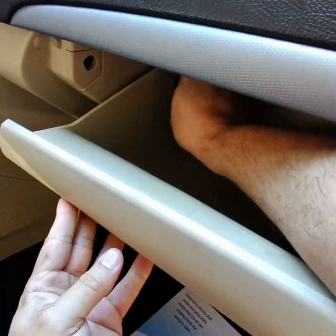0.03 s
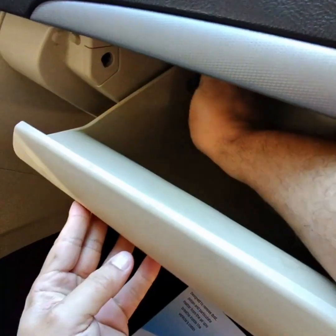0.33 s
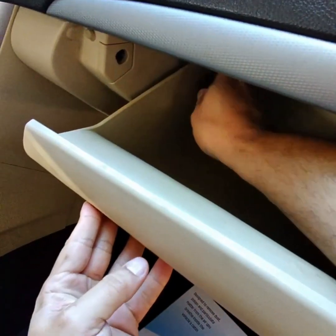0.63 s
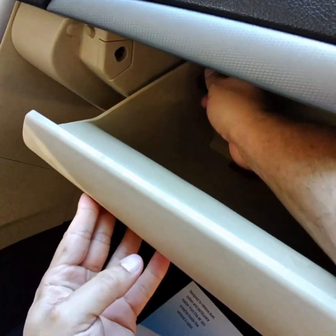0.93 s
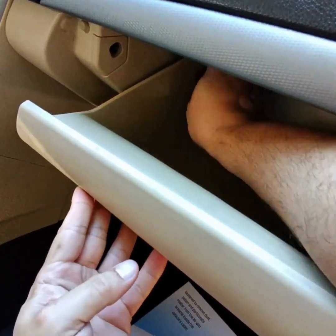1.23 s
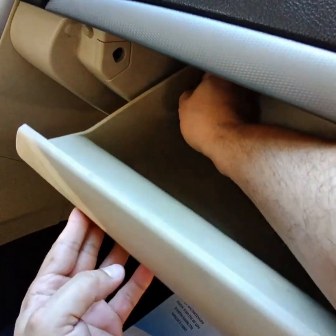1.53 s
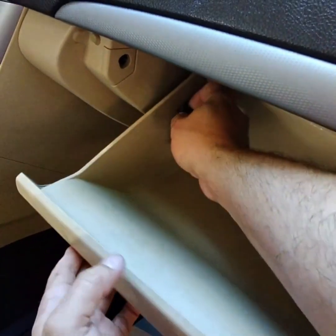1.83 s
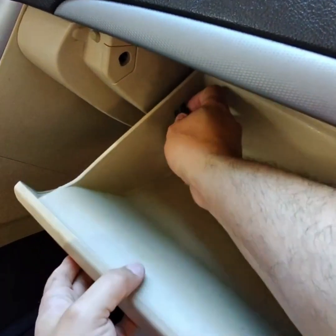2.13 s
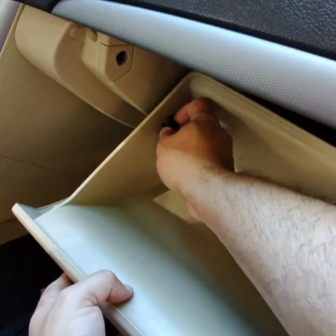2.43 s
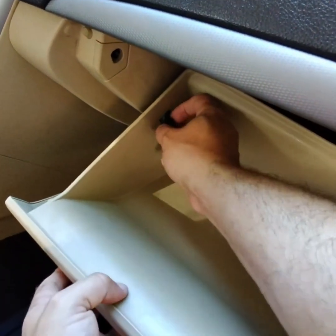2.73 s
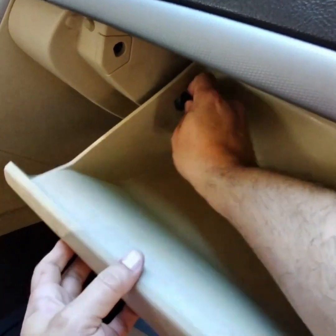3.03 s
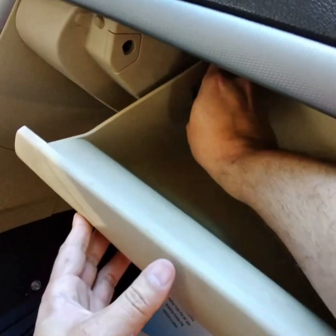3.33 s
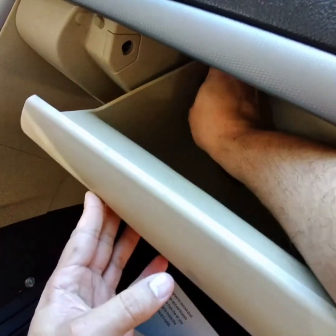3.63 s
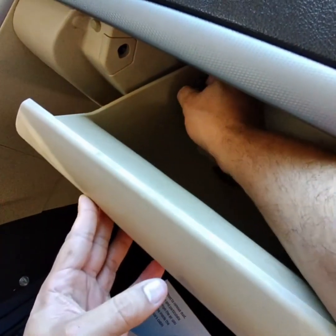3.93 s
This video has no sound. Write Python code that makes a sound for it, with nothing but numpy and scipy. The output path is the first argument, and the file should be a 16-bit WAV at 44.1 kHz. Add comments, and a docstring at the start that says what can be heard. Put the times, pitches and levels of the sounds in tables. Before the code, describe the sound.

Hands rummage in a plastic glove box inside a parked car, heard close up. Faint knocks, clicks and skin rustles mix with brief scrapes as the bin moves, until a catch snaps sharply. A faint rumble lies underneath.

```python
"""Rummaging in a glove box

In a parked car, one hand feels around an open plastic glove box while the other lowers and lifts its lid.
Fingers and a small part knock on the bin and ring its modes; skin hisses over the plastic,
and the bin scrapes and judders on its guides. At the end a catch snaps home. A faint rumble lies below."""
import sys
import numpy as np
from scipy import signal
from scipy.fft import rfft, irfft
from scipy.io import wavfile

SR = 44100
rng = np.random.default_rng(int(sys.argv[2]) if len(sys.argv) > 2 else 0)


def dump(signal):
    """Clip the signal to [-1, 1] and save it as 16-bit WAV at the path in sys.argv[1]."""
    limited = np.clip(np.atleast_2d(signal).T, -1, 1)
    pcm = np.round(limited * 32767).astype(np.int16)
    wavfile.write(sys.argv[1], SR, pcm)


N = 176400
T = np.arange(N) / SR

# modes of the bin: (pitch [Hz], t60 [s], level from the wall [dB], the catch [dB], the guides [dB])
BIN_MODES = [(95.4, 0.42, -7, -7, -2.5), (142.5, 0.13, -7.5, -7, -12), (181.4, 0.18, -3, -10.5, -6),
             (227.3, .1, -5.5, -2, 3.5), (312, 0.04, -0.5, 4, 0), (380, 0.047, -6, -12, -2.5),
             (437.3, 0.038, -7.5, -5.5, -8), (550, 0.055, -7.5, -12, -7), (688, 0.035, 3.5, 0, 4.5),
             (941, 0.036, -1, -5, 0.5), (1079, 0.04, -7, -7, -3.5), (1273, 0.019, 7, 1.5, 10.5),
             (1525, 0.024, 5, -10, -1.5), (1642, 0.019, 0.5, 2, 3), (1779, 0.053, -3, -1, -5),
             (2034, 0.019, -2, 4.5, 8), (2344, 0.031, -5, -7, 1), (2582, 0.057, -10.5, -13.5, -2),
             (2947, 0.036, -28, -4, -31), (3950, 0.067, -25, -8, 1), (4710, 0.045, -15.5, -12, -5),
             (6230, .029, -19, -11, -2), (13300, .03, -25, -6, -26)]
# the bin's four registers, thud, knock, clack and crack: (lower edge [Hz])
REGISTER_EDGES = (0, 480, 1100, 3300)
# cabin rumble: (frequency [Hz], relative level [dB])
RUMBLE_COLOUR = [(20, -24), (38, -14), (55, -5.5), (90, 2), (125, -8), (200, -7), (330, -16), (500, -23.5),
                 (750, -17.5), (1300, -29), (2200, -34), (3300, -45.5), (6000, -47)]
# steady hiss: (frequency [Hz], relative level [dB])
HISS_COLOUR = [(1000, 6.5), (2300, 5), (3500, 4.5), (5500, -10.5), (7500, -3.5), (10000, 1), (13000, 4),
               (15000, 4)]
# hands fidgeting on the bin: (time [s], level before the register trims [dB])
FIDGET_LEVELS = [(.1, -63), (.6, -69.5), (.85, -58.5), (1.25, -54.5), (1.5, -55), (1.95, -63.5),
                 (2.3, -50.5), (2.55, -58.5), (2.95, -58.5), (3.4, -56), (3.65, -58), (3.87, -75)]
# arm brushing the bin: (time [s], level [dB])
RUSTLE_LEVELS = [(.1, -73.5), (1.9, -85.5), (2.15, -72), (2.5, -65), (2.9, -79), (3.1, -71), (3.6, -65),
                 (3.85, -92)]
# its soft tone: (frequency [Hz], relative level [dB])
ARM_COLOUR = [(300, -11.5), (700, -3.5), (1300, -7), (1900, 0.5), (2400, -4), (3000, -27), (5000, -28.5)]
# knocks on the bin wall:
# (time [s], contact length [s], thud [dB], knock [dB], clack [dB], crack [dB], favoured pitch [Hz])
KNOCKS = [(0.092, 0.0063, -62, -59, -66, -74, 1030), (0.134, 0.002, -69, -58.5, -59.5, -89, 1100),
          (0.333, 0.0022, -47, -55.5, -79, -78, 260), (0.413, 0.0034, -54, -79, -63, -63.5, 300),
          (0.5524, 0.0018, -42.5, -49.5, -59.5, -89, 355), (0.7066, 0.002, -50, -48, -45.5, -53, 1720),
          (0.803, 0.0018, -55.5, -61, -65.5, -68.5, 365), (0.857, 0.0055, -53.5, -56, -59.5, -84, 334),
          (0.886, 0.0059, -44, -53, -74, -88, 1060), (0.9055, 0.0031, -48, -43.5, -46, -56, 690),
          (1.0106, 0.00068, -50.5, -38.5, -39.5, -56, 2170), (1.057, 0.0015, -52, -52.5, -92, -83, 664),
          (1.113, 0.0035, -52.5, -57, -67, -71, 324), (1.182, 0.0049, -52.5, -46.5, -56.5, -81, 554),
          (1.3305, 0.003, -51, -53, -51, -75, 700), (1.3378, 0.0028, -41.5, -38.5, -44.5, -62, 2160),
          (1.392, 0.0012, -61, -59.5, -51.5, -58, 1490), (1.434, 0.0074, -52, -56, -61, -66, 365),
          (1.5914, 0.0064, -42, -46, -49.5, -55, 388), (2.049, 0.0014, -50, -58.5, -68, -83, 406),
          (2.2186, 0.00073, -50.5, -60, -53, -49.5, 1360), (2.386, 0.0024, -46, -53, -58.5, -59, 327),
          (2.402, 0.0025, -45.5, -50, -53.5, -57, 320), (2.413, 0.0045, -49.5, -79, -56, -69, 1590),
          (2.61, 0.0034, -53, -53, -58.5, -60, 810), (2.687, 0.0013, -43.5, -50.5, -63, -64.5, 440),
          (2.762, 0.0013, -50, -55.5, -59, -70, 1250), (2.812, 0.0059, -58, -57, -54.5, -67, 1250),
          (2.828, 0.0048, -53, -61, -55, -68, 307), (2.846, 0.004, -51.5, -56.5, -78, -76, 264),
          (2.951, 0.0028, -53, -58, -85, -81, 310), (3.043, 0.0035, -71, -57, -62, -66.5, 1650),
          (3.2066, 0.0042, -55, -52, -48, -80, 2620), (3.212, 0.0032, -43.5, -51, -50, -78, 2560),
          (3.218, .002, -39.5, -41, -44.5, -71, 454), (3.279, 0.0081, -49, -50.5, -62.5, -87, 970),
          (3.291, 0.0044, -73, -48.5, -71, -85, 970), (3.417, 0.0059, -49, -54, -55.5, -63, 310),
          (3.47, 0.0029, -47, -53.5, -51, -58, 278), (3.555, 0.0028, -48.5, -59.5, -61, -80, 324),
          (3.67, 0.008, -54.5, -56.5, -59.5, -68.5, 380), (3.688, 0.0042, -50, -55, -69, -83, 268),
          (3.806, 0.0033, -57, -59.5, -70, -92, 980)]
# bright crack of a hard contact: (frequency [Hz], relative level [dB])
CRACK_COLOUR = [(2400, -8), (3300, -4), (3800, -3), (4500, 2.5), (5600, -6.5), (6800, -4), (9000, -6),
                (11000, -2.5), (13200, -2), (15000, 1)]
# skin sliding over plastic: (start [s], end [s], level [dB])
SKIN_SLIDES = [(0.282, 0.447, -70.5), (0.625, 0.704, -70), (1.06, 1.177, -62.5), (1.15, 1.307, -59.5),
               (1.27, 1.412, -68), (1.892, 1.98, -65.5), (2.012, 2.164, -62.5), (2.097, 2.246, -65.5),
               (2.176, 2.486, -57), (2.78, 2.91, -65), (3.022, 3.152, -58), (3.36, 3.495, -68.5)]
# its hiss: (frequency [Hz], relative level [dB])
SKIN_COLOUR = [(1500, -15), (3200, 0), (4600, -5), (5400, -9), (6500, -6.5), (9000, 1.5), (12500, 2),
               (14500, 2)]
# three short chirps, then a faint, thin high ring after the knocks:
# (time [s], length [s], first pitch [Hz], last pitch [Hz], peak level [dB])
CHIRPS_AND_RING = [(1.175, 0.019, 665, 520, -33), (2.399, 0.013, 13800, 13000, -53),
                   (2.832, .02, 6600, 9000, -65), (3.21, 0.048, 8600, 8450, -73)]
# the bin scraping its guides: (start [s], end [s], thud [dB], knock [dB], clack [dB], crack [dB])
GUIDE_RUBS = [(1.572, 1.724, -48.5, -55.5, -54, -71), (1.642, 1.781, -43.5, -55.5, -49.5, -69),
              (2.068, 2.239, -47, -53, -57, -69.5), (2.333, 2.45, -54, -55.5, -60, -74),
              (2.788, 2.87, -56.5, -60, -59, -77), (3.059, 3.157, -52, -65, -61.5, -84)]
# the bin juddering on its way down: (start [s], end [s], pitch [Hz], level [dB])
JUDDERS = [(1.654, 1.77, 120.4, -47), (2.064, 2.236, 152, -43)]
# the catch tripping: (time [s], half-width [s], pitch [Hz], peak level [dB])
CATCH_TICK = [(3.9144, 0.00045, 1580, -7.5)]
# the catch slamming and settling:
# (time [s], contact length [s], thud [dB], knock [dB], clack [dB], crack [dB], favoured pitch [Hz])
CATCH_HITS = [(3.9168, 0.0019, -25, -27, -21, -31, 4300), (3.9255, 0.0022, -47, -49, -54, -58, 280),
              (3.945, .004, -45, -53, -52, -64, 310)]
# two microphone ports, alike in the lows: (frequency [Hz], left over right [dB], left phase lead [rad])
PORT_LOWS = [(450, 0, 0)]
# and unlike higher up: (frequency [Hz], left over right [dB], left phase lead [rad])
PORT_HIGHS = [(1220, 0, 0.12), (2250, -1.4, 0.44), (3200, 0, 2.22), (4400, -2.5, 1.92), (5200, -8.5, 2.16),
              (7350, 2.5, -0.39), (11000, 10, -0.22), (14700, 11, -0.58)]

CRACK_T60_S, CRACK_TAIL_T60_S, CRACK_TAIL_DB = 0.0093, 0.075, -3
CRACK_LIKENESS, CRACK_RING_DB = 0.53, -7
FAVOUR_DB, FAVOUR_WIDTH_OCTAVES = 13.5, 0.21


def from_db(db):
    """Decibels to gain."""
    return 10 ** (np.asarray(db) / 20)


def rms_one(x):
    """Scale to unit rms."""
    return x / np.sqrt(np.mean(x ** 2) + 1e-20)


def mix(levels_db, layers):
    """Sum layers, each at its own level."""
    return sum(from_db(db) * layer for db, layer in zip(levels_db, layers))


def over_hz(points, size):
    """Spread the columns of a frequency table over an FFT grid."""
    hz, *columns = np.transpose(points)
    return [np.interp(np.log(np.fft.rfftfreq(size, 1 / SR) + 1), np.log(hz), c) for c in columns]


def lowpass(x, hz):
    """Roll off the top at 12 dB an octave."""
    return signal.sosfilt(signal.butter(2, hz, fs=SR, output="sos"), x)


def noise(colour, likeness=1):
    """Coloured stereo noise; likeness runs from 0 (wide) to 1 (mono)."""
    mid, side = irfft(rfft(rng.standard_normal((2, N))) * from_db(over_hz(colour, N)[0]), N)
    return rms_one(np.sqrt(1 + likeness) * mid + np.sqrt(1 - likeness) * np.array([side, -side]))


def drift(per_s):
    """A random wobble of unit rms."""
    return rms_one(np.interp(T * per_s, np.arange(2000), rng.standard_normal(2000)))


def decay(t, t60):
    """Fall by 60 dB every t60 seconds."""
    return np.exp(-np.log(1000) * t / t60)


def stroke(start, end, fade_s=0.054):
    """Swell, hold and release of a hand movement."""
    return np.sin(np.pi / 2 * np.clip(np.minimum(T - start, end - T) / fade_s, 0, 1))


def bin_ring(force, place, scatter_db=0, favoured_hz=None):
    """A force at one place rings the bin's modes: four registers, low to high, each at unit rms."""
    registers = np.zeros((4, len(force)))
    force = force + 1e-18 * rng.standard_normal(len(force))
    for hz, t60, wall_db, catch_db, guides_db in BIN_MODES:
        db = dict(wall=wall_db, catch=catch_db, guides=guides_db)[place]
        radius, angle = decay(1 / SR, t60), 2 * np.pi * hz / SR
        mode = signal.lfilter([1, 0, -1], [1, -2 * radius * np.cos(angle), radius ** 2], force)
        mode = rms_one(lowpass(mode, min(1.6 * hz, .45 * SR)))
        if favoured_hz:  # the struck spot brings out nearby modes
            db += FAVOUR_DB * np.exp(-(np.log2(hz / favoured_hz) / FAVOUR_WIDTH_OCTAVES) ** 2)
        registers[np.searchsorted(REGISTER_EDGES, hz) - 1] += mode * from_db(db + scatter_db * rng.normal())
    return [rms_one(register) for register in registers]


def crack(burst, high_modes):
    """The bright edge of a contact: noise with the bin's top modes tucked under it."""
    return rms_one(rms_one(burst) + from_db(CRACK_RING_DB) * high_modes)


def friction(place, slips_per_s, spread_db):
    """Uneven stick-slip impulses drive the bin: returns thud, knock, clack and crack."""
    slips = (rng.random(N) < slips_per_s / SR) * rng.choice([-1, 1], N)
    force = slips * from_db(spread_db * np.minimum(rng.exponential(1, N), 4))
    grain = np.sqrt(signal.lfilter([1], [1, -decay(2 / SR, CRACK_T60_S)], force ** 2) + 1e-12)
    *lows, high = bin_ring(force, place)
    return lows + [crack(grain * noise(CRACK_COLOUR, CRACK_LIKENESS), high)]


def cabin_bed(rumble_db=-54, waver_db=0.5, hiss_db=-73):
    """A gently wavering rumble under a thin, wide hiss."""
    rumble = from_db(rumble_db + waver_db * drift(8.1)) * noise(RUMBLE_COLOUR)
    return rumble + from_db(hiss_db) * noise(HISS_COLOUR, likeness=0.19)


def fidgeting(register_trims_db=(-3, -21, -12.5, -20.5)):
    """Faint ticks and creaks as the hands shift their grip."""
    creaks = mix(register_trims_db, friction("wall", slips_per_s=350, spread_db=4))
    return from_db(np.interp(T, *np.transpose(FIDGET_LEVELS))) * creaks


def arm_rustle(flutter_db=3.5):
    """The arm brushes softly along the bin."""
    level_db = np.interp(T, *np.transpose(RUSTLE_LEVELS)) + flutter_db * drift(24.62)
    return from_db(level_db) * noise(ARM_COLOUR, likeness=0.9)


def knocks(hits, place, scatter_db, grit_db, slips_per_s=1100):
    """Each hit is one push and a few tiny slips; it rings the bin and gives a short crack."""
    out = np.zeros((2, N + SR))
    size, lead = SR // 5, SR // 100
    t = T[:size] - lead / SR
    age = np.maximum(t, 0)
    bright = noise(CRACK_COLOUR, CRACK_LIKENESS)
    gain = np.sqrt(.025 * SR / size)  # a hit carries the energy of 25 ms at its listed levels
    for time, length, *levels_db, favoured_hz in hits:
        touch = np.exp(-(t / length - .5) ** 2 / 2) * (t >= 0)
        force = (rng.random(size) < slips_per_s / SR) * rng.normal(0, from_db(grit_db), size) * touch
        force[lead] += 1
        *lows, high = bin_ring(force, place, scatter_db, favoured_hz)
        attack = 1 + np.tanh(2 * t / length - .5)
        fade = decay(age, CRACK_T60_S + length) + from_db(CRACK_TAIL_DB) * decay(age, CRACK_TAIL_T60_S)
        burst = np.roll(bright, rng.integers(N), axis=1)[:, :size] * attack * fade
        start = int(time * SR) - lead
        out[:, start:start + size] += gain * mix(levels_db, lows + [crack(burst, high)])
    return out[:, :N]


def scratchy(hiss, band_hz=650, depth_db=1.5, catches_per_s=130):
    """Bands of the treble swell and fade on their own as skin catches on the grain."""
    spectrum, hz = rfft(hiss), np.fft.rfftfreq(N, 1 / SR)
    band = np.clip((15080 - hz) // band_hz, 0, 13)  # counted down from the top
    layers = [irfft(spectrum * (band == k), N) for k in np.unique(band)]
    return rms_one(sum(layer * from_db(depth_db * drift(catches_per_s)) for layer in layers))


def skin_slides(peak_share=0.56, flutter_db=1.56):
    """Skin hisses over grained plastic; each slide gathers speed, peaks and stops."""
    power = np.zeros(N)
    for start, end, db in SKIN_SLIDES:
        speed = np.interp(T, [start, start + peak_share * (end - start), end], [0, 1, 0])
        power += (from_db(db) * np.sin(np.pi / 2 * speed)) ** 2
    level = np.sqrt(power) * from_db(flutter_db * drift(70))
    return level * scratchy(noise(SKIN_COLOUR, likeness=0.71))


def chirps_and_ring(jitter=0.0098):
    """Brief gliding tones: three stick-slip chirps, then a faint, thin high ring after the knocks."""
    out = np.zeros(N)
    for time, length, first_hz, last_hz, db in CHIRPS_AND_RING:
        progress = np.clip((T - time) / length, 0, 1)
        hz = (first_hz + (last_hz - first_hz) * progress) * (1 + jitter * drift(400))
        envelope = np.sin(np.pi * progress ** 0.5) ** 2
        out += from_db(db) * envelope * np.sin(2 * np.pi * np.cumsum(hz) / SR)
    return out


def guide_rubs():
    """The swinging bin scrapes on its guides in a dense run of slips."""
    registers = friction("guides", slips_per_s=1000, spread_db=2.5)
    return sum(stroke(start, end) * mix(levels_db, registers) for start, end, *levels_db in GUIDE_RUBS)


def bin_judder(jitter=0.144, flutter_db=3):
    """The bin judders on its way down: a low tone, rough in pitch and level."""
    out = np.zeros(N)
    for start, end, centre_hz, db in JUDDERS:
        hz = centre_hz * (1 + jitter * drift(120))
        tone = np.sin(2 * np.pi * np.cumsum(hz) / SR) * from_db(flutter_db * drift(59.44))
        out += from_db(db) * rms_one(tone) * stroke(start, end)
    return out


def catch_snap(tick_noise_db=-23):
    """The catch trips with a dead, dry tick, then slams into the bin."""
    (time, width, hz, db), = CATCH_TICK
    t = T - time
    tick = np.cos(2 * np.pi * hz * t) + from_db(tick_noise_db) * noise(CRACK_COLOUR, CRACK_LIKENESS)
    envelope = np.exp(-np.abs(t / width) ** 1.54 / 2)
    return from_db(db) * tick * envelope + knocks(CATCH_HITS, "catch", scatter_db=.3, grit_db=-27)


def cabin_reflections(x, t60_s=0.054, send_db=-11, dull_hz=1140):
    """The upholstered cabin throws back a short, dull tail."""
    t = T[:SR // 3]
    tail = lowpass(rng.standard_normal(len(t)), dull_hz) * decay(t, t60_s) * (t > .004)
    tail *= np.sqrt(2 * dull_hz / SR / np.sum(tail ** 2))  # about unity gain in the lows
    return from_db(send_db) * signal.fftconvolve(x, tail[None], axes=1)[:, :N]


def scene():
    """The glove box and its reflections over the cabin's bed of rumble and hiss."""
    box = knocks(KNOCKS, "wall", scatter_db=7, grit_db=-4.5) + catch_snap()
    box += guide_rubs() + bin_judder()
    box += fidgeting() + skin_slides() + chirps_and_ring() + arm_rustle()
    return box + cabin_reflections(box) + cabin_bed()


def record(dry):
    """Two ports colour the treble differently; the sound fades in fast, deep bass and top are cut."""
    start_s, low_cut_hz, high_cut_hz = 0.079, 55, 15080
    size = N + SR // 10
    balance_db, phase = over_hz(PORT_LOWS + PORT_HIGHS, size)
    ports = from_db([balance_db / 2, -balance_db / 2]) * np.exp(1j * np.array([phase / 2, -phase / 2]))
    ports /= np.sqrt(np.mean(abs(ports) ** 2, axis=0))
    fade_in = np.clip((T - start_s) / .005, 0, 1)
    heard = irfft(rfft(dry, size) * ports, size)[:, :N] * fade_in
    heard = signal.sosfilt(signal.butter(2, low_cut_hz, "high", fs=SR, output="sos"), heard)
    return signal.sosfilt(signal.cheby2(16, 70, high_cut_hz, fs=SR, output="sos"), heard)


dry = scene()
out = record(dry)
dump(out)
```